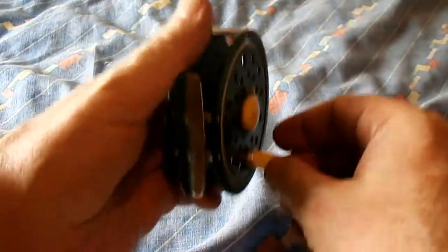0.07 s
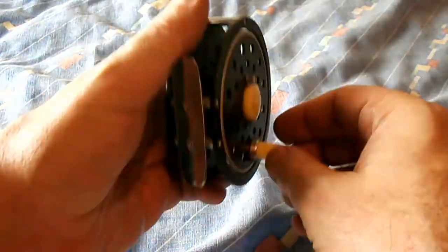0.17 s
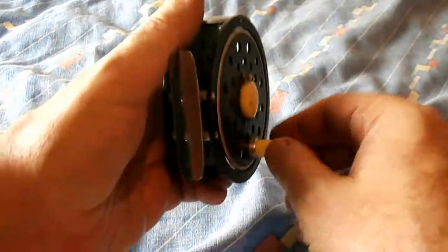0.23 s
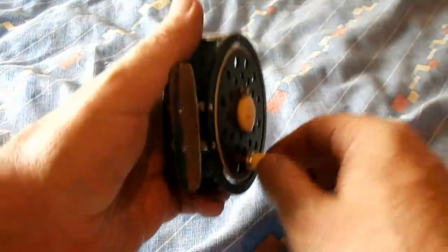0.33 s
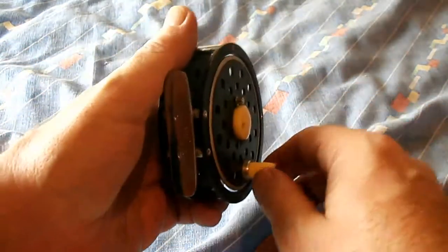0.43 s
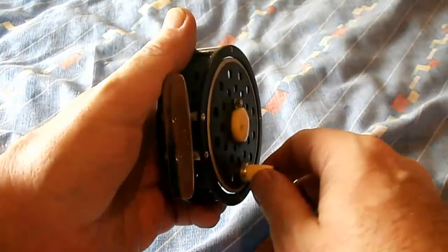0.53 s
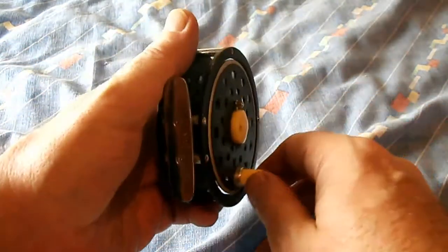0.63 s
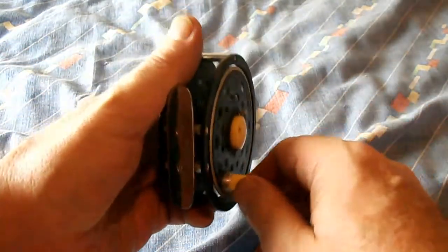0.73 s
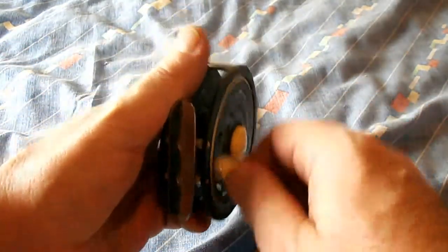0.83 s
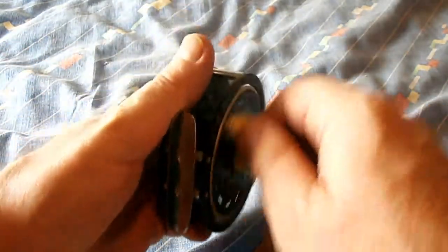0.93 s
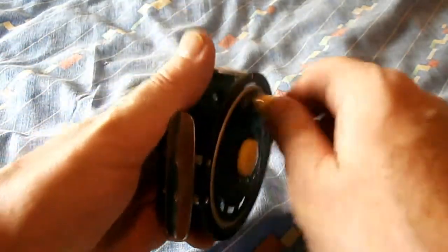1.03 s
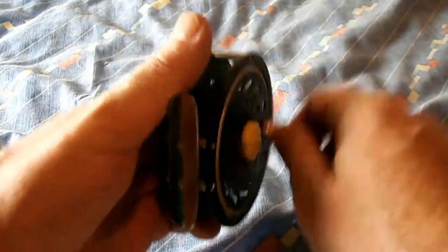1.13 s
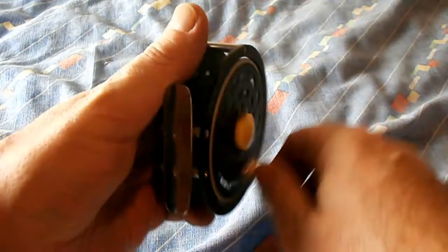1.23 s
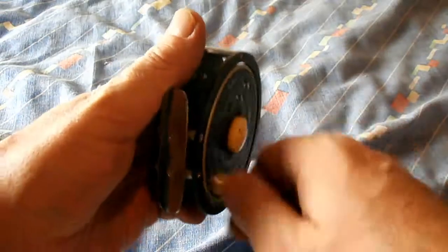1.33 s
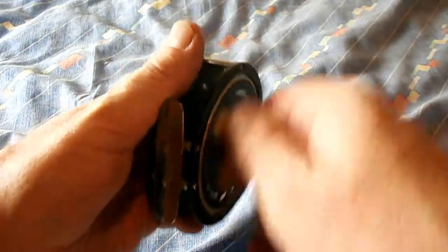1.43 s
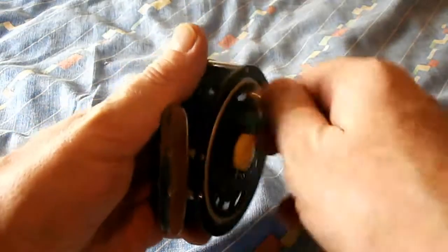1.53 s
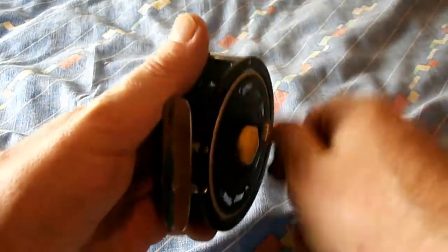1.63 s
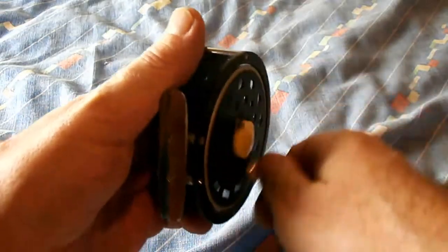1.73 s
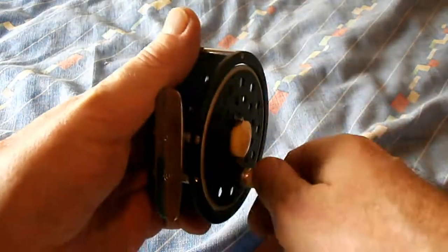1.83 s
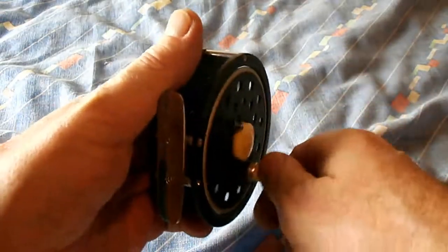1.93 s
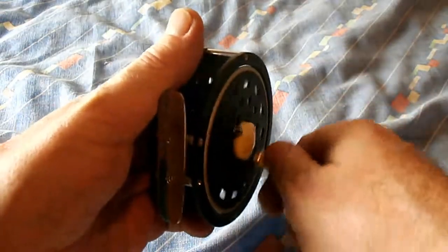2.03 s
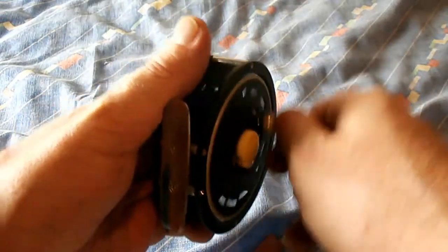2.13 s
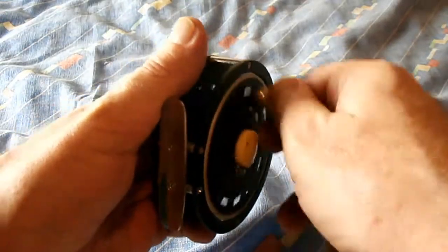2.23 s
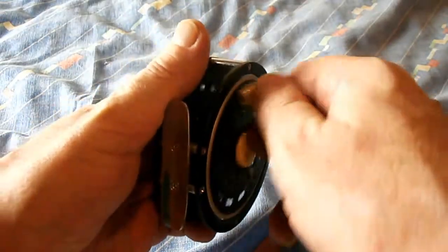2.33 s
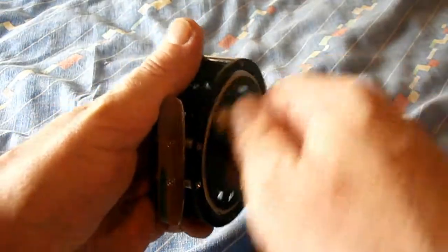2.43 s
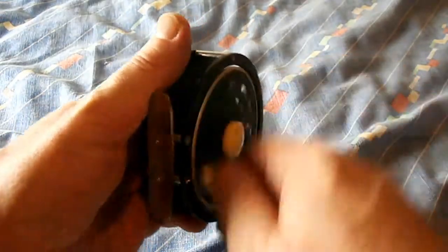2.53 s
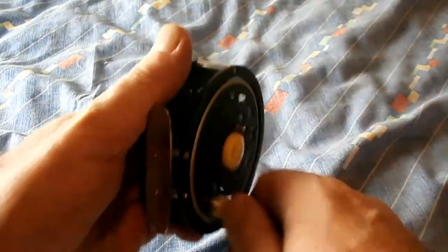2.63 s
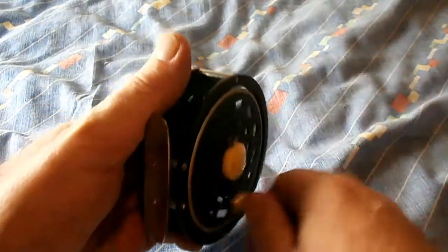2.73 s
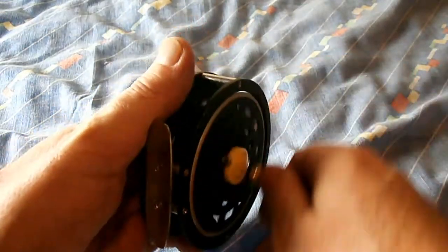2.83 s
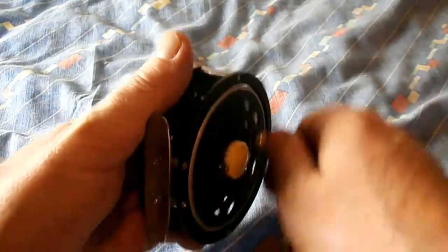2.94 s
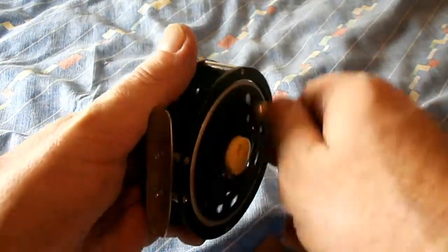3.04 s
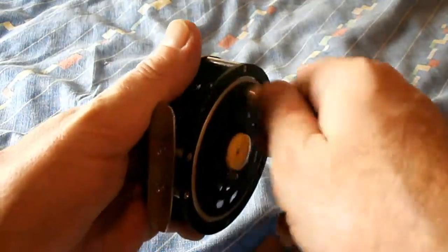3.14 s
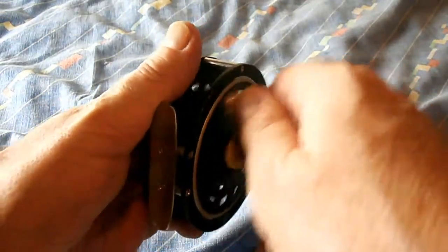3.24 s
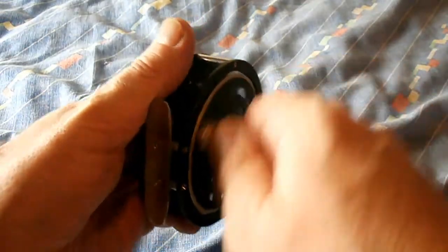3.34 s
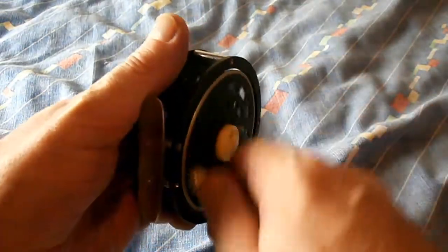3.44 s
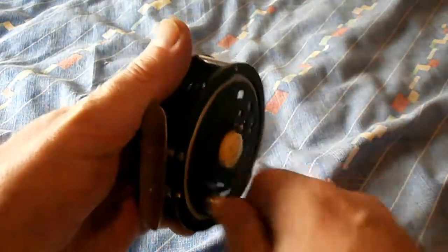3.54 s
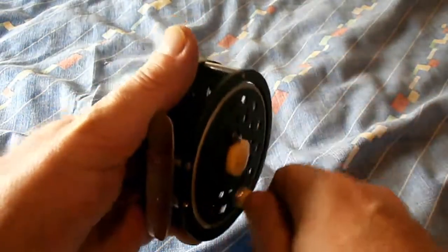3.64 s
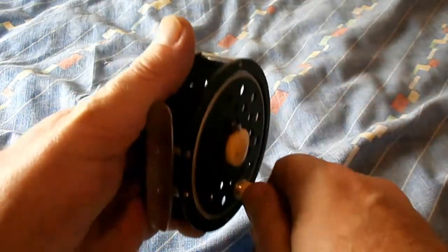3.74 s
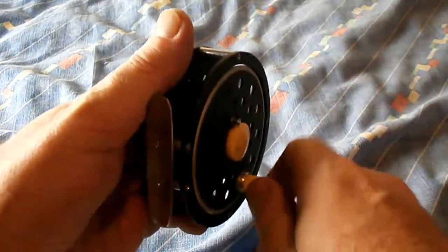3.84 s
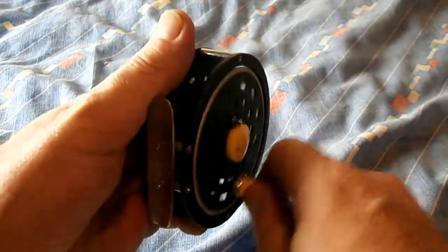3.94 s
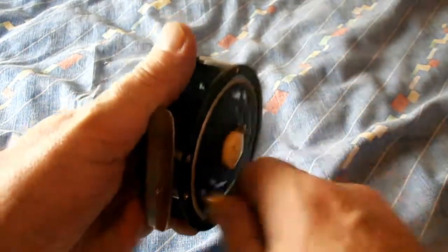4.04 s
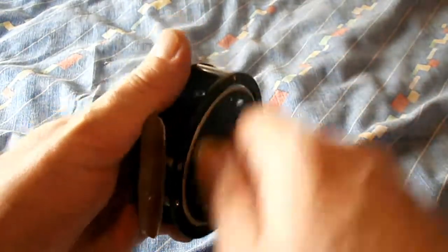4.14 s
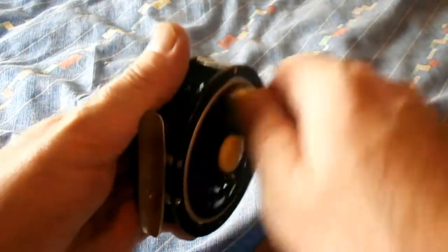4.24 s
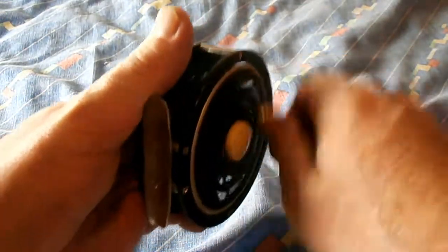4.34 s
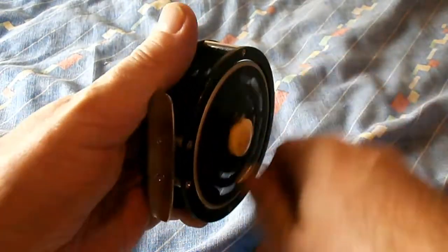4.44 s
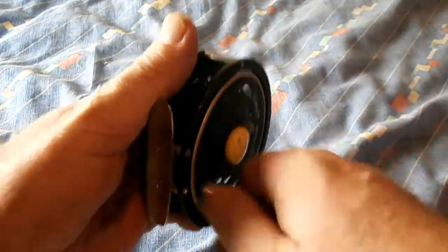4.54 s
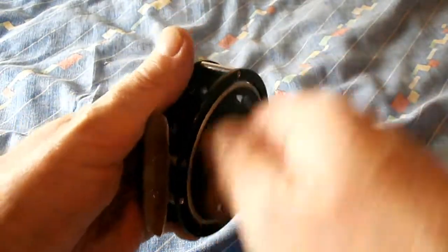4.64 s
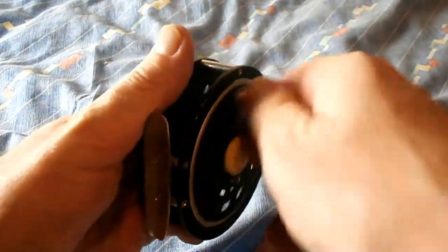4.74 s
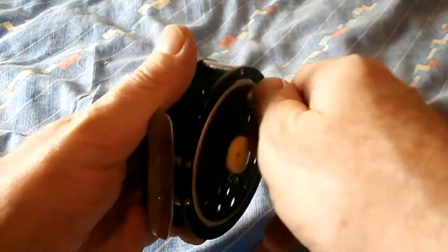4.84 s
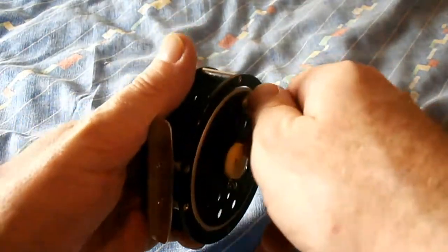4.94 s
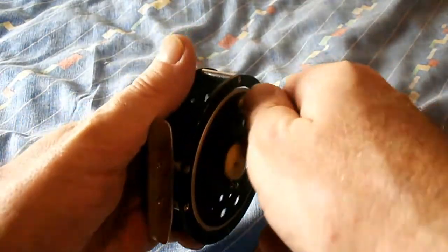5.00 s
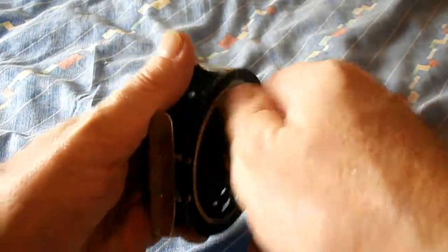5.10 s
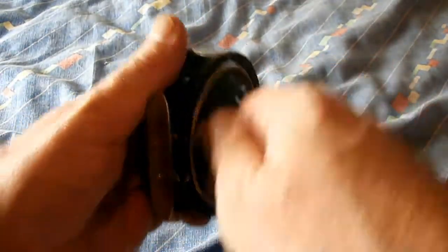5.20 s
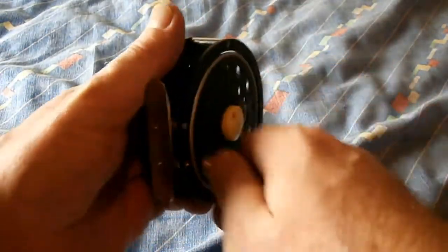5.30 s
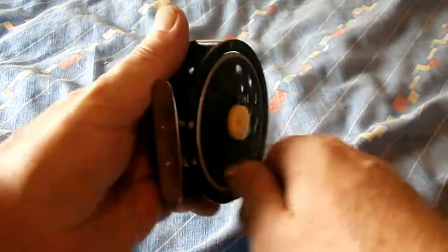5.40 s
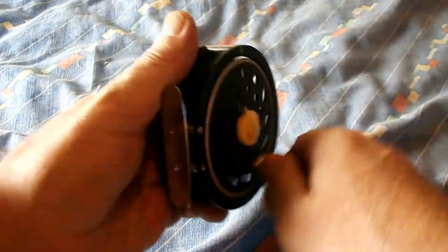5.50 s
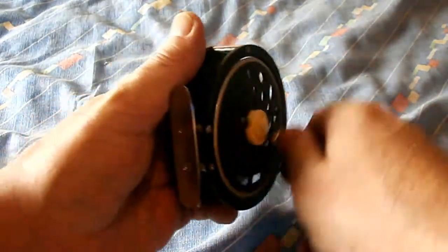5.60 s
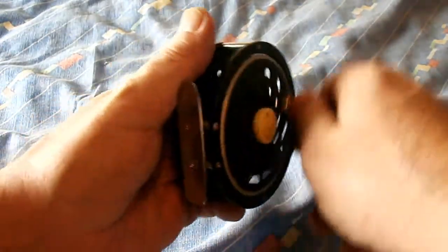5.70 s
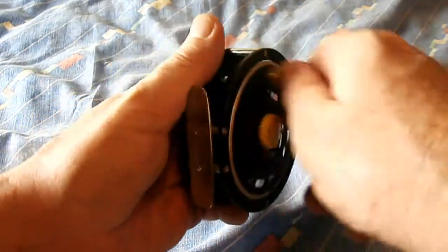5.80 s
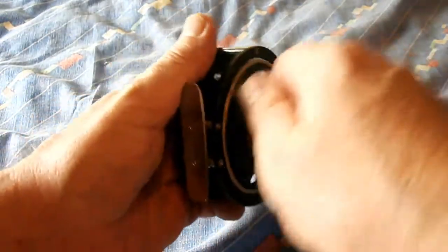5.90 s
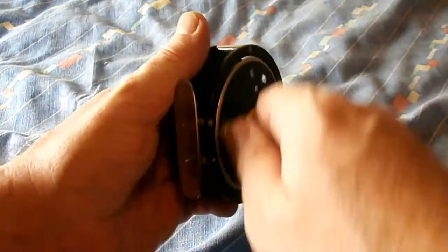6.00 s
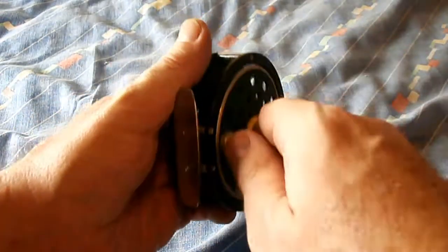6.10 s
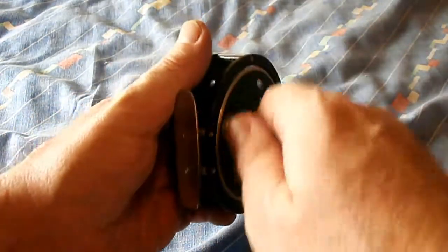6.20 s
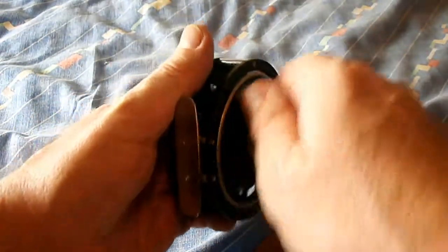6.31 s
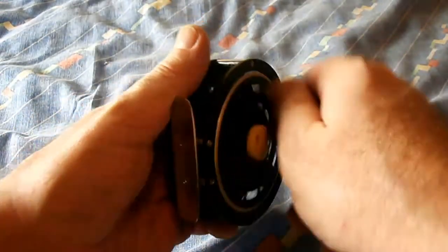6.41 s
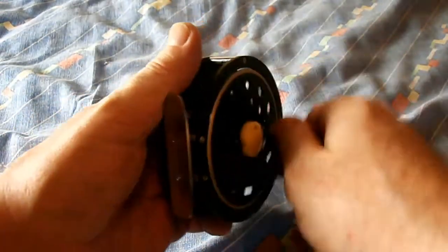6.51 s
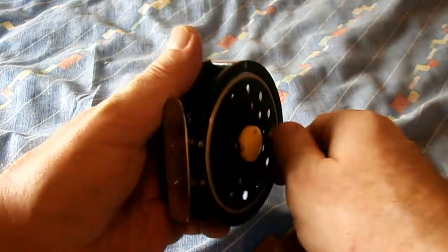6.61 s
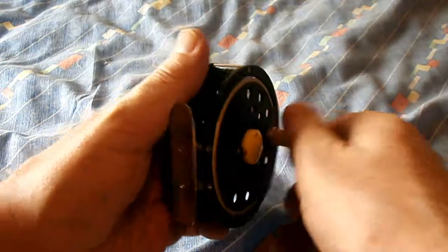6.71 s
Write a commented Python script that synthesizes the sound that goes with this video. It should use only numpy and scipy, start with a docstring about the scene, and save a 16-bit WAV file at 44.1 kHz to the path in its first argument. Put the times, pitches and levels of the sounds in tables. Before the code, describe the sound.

A fishing reel is cranked by hand, its ratchet snapping in four short runs of sharp metallic clicks over faint room hiss.

```python
"""A soft bedroom rumble, hiss and a thin electronic whine run from start to end. Loose parts tick first.
Then a hand cranks a fly reel: its pawl, a springy catch, snaps over the ratchet teeth. Each snap
overloads the small microphone close by and leaves a short echo. After 2 s the reel turns the other way,
and at 3.7 s a hand bumps the frame. The reel goes forward again, backward from 5 s, then forward for
two last snaps, and two light ticks end the scene."""
import sys
import numpy as np
from scipy import signal
from scipy.fft import rfft, irfft, next_fast_len
from scipy.io import wavfile

SR = 44100
rng = np.random.default_rng(int(sys.argv[2]) if len(sys.argv) > 2 else 0)


def unload_audio(sound):
    """Save the sound as a 16-bit wav file, at the path given as the first command line argument."""
    columns = np.transpose(np.atleast_2d(sound))
    # keep every value between -1 and 1, then stretch to whole-number steps
    steps = np.round(np.clip(columns, -1, 1) * 32767)
    wavfile.write(sys.argv[1], SR, steps.astype(np.int16))


N = 298116
TIME = np.arange(N) / SR
AGE = np.arange(int(.3 * SR)) / SR  # seconds since a short sound began


def undb(db):
    """Turn decibels into a number to multiply by."""
    return 10 ** (np.asarray(db) / 20)


def unit(x):
    """Scale a sound to an average (rms) level of 1."""
    return x / np.sqrt(np.mean(x ** 2))


def add(track, s, sound):
    """Mix a sound into the track, starting at s seconds."""
    start = int(s * SR)
    track[start:start + len(sound)] += sound[:len(track) - start]


def colour(x, points):
    """Turn lows and highs up or down along a curve of (pitch_hz, gain_db) points."""
    hz, db = np.transpose(points)
    size = 2 * next_fast_len(len(x) // 2 + 1)
    bins = np.maximum(np.fft.rfftfreq(size, 1 / SR), 1)
    gain = undb(np.interp(np.log(bins), np.log(hz), db))
    # these steps keep the filter from ringing before a sound starts
    cepstrum = irfft(np.log(gain))[:size // 2]
    cepstrum[1:] *= 2
    return irfft(rfft(x, size) * np.exp(rfft(cepstrum, size)))[:len(x)]


def band_noise(hz, q):
    """Noise around one pitch; a higher q makes the band narrower."""
    b, a = signal.iirpeak(hz, q, SR)
    noise = rng.standard_normal(len(AGE))
    return unit(signal.lfilter(b, a, signal.lfilter(b, a, noise)))


def whine(hz, db, wander_hz, turns_per_s=12):
    """A thin electronic tone whose pitch wanders a little at random."""
    turns = rng.standard_normal(int(turns_per_s * N / SR) + 2)
    pitch_hz = hz + wander_hz * np.interp(TIME * turns_per_s, np.arange(len(turns)), turns)
    return np.sqrt(2) * undb(db) * np.sin(2 * np.pi * np.cumsum(pitch_hz) / SR)


def background():
    """The room rumbles, the microphone hisses and the electronics whine."""
    # shape of the rumble and hiss: pitch_hz, gain_db
    noise_shape = [(25, -2), (60, 4), (130, 8.5), (280, 5), (600, -2.5), (1500, -13.5), (3500, -15.5),
                   (5500, -18.5), (8000, -15.5), (9900, -10), (11800, -18.5), (14200, -18), (15000, -16),
                   (15700, -60)]
    # whines of steady loudness: pitch_hz, level_db, wander_hz
    steady_whines = [(3262, -84, 2), (14947, -62, 1), (15004, -77, 3), (14889, -78, 3), (15176, -81, 15)]
    # one more whine swells and fades: time_s, level_db
    swell = [(0.1, -77.5), (0.6, -76.5), (1.98, -71), (3.92, -81), (5.01, -74.5), (6.26, -69), (6.71, -82)]
    out = undb(-58) * unit(colour(rng.standard_normal(N), noise_shape))
    for hz, db, wander_hz in steady_whines:
        out += whine(hz, db, wander_hz)
    swell_db = np.interp(TIME, *np.transpose(swell))
    return out + whine(3398.5, swell_db, wander_hz=2)


def room_echo(x, fade_s=0.2, build_s=0.031, early_db=-6, grain=0.5):
    """Wall echoes build up and die in the bedding; the reel sways, so each sound gets a new pattern."""
    echoes = rng.standard_normal(len(AGE)) * np.exp(grain * rng.standard_normal(len(AGE)))
    build_up = undb(early_db * np.exp(-(AGE / build_s) ** 2))
    tail = echoes * build_up * np.exp(-np.log(1000) * AGE / fade_s)
    # the small reel sends few low notes into the room: pitch_hz, gain_db
    shape = [(1000, -18.5), (2200, -8.5), (3000, -9), (4050, -3.5), (5200, -3), (7000, -5.5),
             (14000, -8.5)]
    tail = colour(tail / np.sqrt(np.sum(tail ** 2)), shape)
    return undb(-6) * signal.fftconvolve(x, tail)[:len(x)]


def ring(notes):
    """A struck part rings with notes that drop 60 dB in fade_s; each blow lands a little differently."""
    out = 0
    for hz, db, fade_s in notes:
        scatter_db, detune, phase = rng.standard_normal(3) * [1.5, .005, np.pi]
        wave = np.sin(2 * np.pi * hz * (1 + detune) * AGE + phase)
        out = out + undb(db + scatter_db) * wave * np.exp(-np.log(1000) * AGE / fade_s)
    return out


def handling(tick_s=0.0027):
    """The loose handle ticks against the spool; the soft hand gives the frame only a dull bump."""
    # light ticks: start_s, level_db, pitch_hz, spool_ring_db
    ticks = [(0.2258, -55.5, 3360, -16), (0.289, -47, 3170, -27), (0.9957, -47, 7850, -40),
             (1.505, -46, 8700, -41), (2.176, -50.5, 3500, -20), (3.679, -52, 2900, -25),
             (3.9365, -50, 2840, -30), (6.3455, -47, 7740, -34), (6.6893, -51, 2860, -26),
             (6.7413, -53.5, 2350, -2)]
    # notes of the free spool: pitch_hz, level_db, fade_s
    spool_notes = [(2283, 0, .25), (5292, -8, .25), (7747, -7, .25), (10750, -14, .15)]
    # hand bumps: start_s, level_db, pitch_hz, decay_s
    bumps = [(3.738, -48, 527, 0.022), (3.750, -50.5, 840, 0.035)]
    out = np.zeros(N)
    for start_s, db, hz, ring_db in ticks:
        click = band_noise(hz, q=1.6) * np.exp(-AGE / tick_s)
        tick = undb(db) * (click + undb(ring_db) * ring(spool_notes))
        add(out, start_s, tick + room_echo(tick))
    for start_s, db, hz, decay_s in bumps:
        add(out, start_s, undb(db) * band_noise(hz, q=1.7) * np.exp(-AGE / decay_s))
    return out


def crack(shape, decay_s=0.0014):
    """Steel hits a tooth: a very short, dry burst of noise."""
    return undb(-4) * unit(colour(rng.standard_normal(len(AGE)), shape)) * np.exp(-AGE / decay_s)


def pawl(thud_hz=320, thud_s=0.0003, fizz_s=0.0005, bounce_s=0.003):
    """The springy pawl cracks onto each tooth, rings the reel and bounces once."""
    # one snap per tooth: start_s, strength_db
    snaps = [(0.8847, -6.5), (1.0393, -0.9), (1.1693, -0.5), (1.3075, -4), (1.431, -7.5), (1.5398, -0.5),
             (1.669, -1.7), (2.2152, -4), (2.3224, -4), (2.4299, -3), (2.5213, -2.5), (2.589, -2.5),
             (2.7064, -3.5), (2.8035, -8.5), (2.9183, -2), (3.0514, -3.5), (3.1928, -3), (3.2996, -0.5),
             (3.4016, -3.1), (3.4977, -3.5), (3.5933, -4), (4.126, -8), (4.2504, -1), (4.37, -4),
             (4.4865, -4.9), (4.6115, -6.5), (4.7382, -2.5), (5.169, -2.5), (5.2568, -3), (5.3417, -2.5),
             (5.4583, -4), (5.5543, -2.7), (5.6893, -3), (5.7825, -1.8), (5.8514, -6), (5.9305, -5.5),
             (6.0196, -3), (6.395, -2.4), (6.5424, -1)]
    # when the handle turns backward: start_s, end_s
    backward_spans = [(2.0, 3.8), (5.0, 6.2)]
    # shape of the crack of steel: pitch_hz, gain_db
    crack_shape = [(1500, -39), (2800, -23), (4000, -14), (5100, -22.5), (5700, -15.5), (6250, -2.5),
                   (7250, 2), (7800, -3.5), (8900, -4.5), (9900, -10), (11000, -9), (13300, -13),
                   (15500, -15)]
    # notes of the struck reel: pitch_hz, forward_db, backward_db, fade_s
    reel_notes = [(1824, -25.5, -42, 0.037), (2002, -25, -37.5, 0.019), (2302, -30, -38.5, 0.043),
                  (2930, -15.5, -28.5, 0.02), (3824, -41, -23, 0.017), (4226, -30.5, -39, 0.1),
                  (4480, -43, -45, 0.009), (6020, -15, -18, 0.011), (6560, -8, -12, 0.01),
                  (6760, -5, -3, 0.01), (7316, -2.5, -3.5, 0.01), (8210, -28, -4.5, 0.0064),
                  (8832, -4, -6, 0.015)]
    # the bounce is too light to shake the side plate, so it sounds thinner: pitch_hz, gain_db
    bounce_shape = [(4500, -8.5), (6000, 0)]
    # going backward, the pawl hits the other side of the teeth and sounds fuller; harder snaps mainly
    # add ring at 6-8 kHz: pitch_hz, forward_db, backward_db, growth (dB per dB of strength)
    contact = [(3000, -4, 4, -0.12), (3520, -4.5, 4, 0.28), (4600, -6, 3.5, 0), (5950, 0, -2, 0.87),
               (7800, 0.5, 1.5, 1), (9100, -3, 1, .5), (10600, -6, -1.33, 0.17)]
    out = np.zeros(N)
    blow = colour(signal.unit_impulse(len(AGE)), crack_shape)  # the crack as sent into the room
    blow = undb(9) * blow / np.sqrt(np.sum(blow ** 2))
    # a short low thud from the overloaded microphone on each snap
    thud = np.cos(2 * np.pi * thud_hz * AGE) * np.exp(-AGE / thud_s)
    for start_s, strength_db in snaps:
        backward = any(start < start_s < end for start, end in backward_spans)
        notes = [(hz, back_db if backward else forward_db, fade_s)
                 for hz, forward_db, back_db, fade_s in reel_notes]
        ringing = undb(-13) * ring(notes)
        strike, bounce = crack(crack_shape), crack(crack_shape)
        # a very short, very high fizz as the snap overloads the microphone
        fizz = undb(-9) * band_noise(hz=14900, q=4.5) * np.exp(-AGE / fizz_s)
        direct = strike + ringing + fizz
        add(direct, bounce_s * rng.uniform(.88, 1.12), undb(-9) * colour(bounce, bounce_shape))
        snap_shape = [(hz, (back_db if backward else forward_db) + growth * strength_db)
                      for hz, forward_db, back_db, growth in contact]
        thud_db = strength_db + (-15.5 if backward else -24) + 2.5 * rng.standard_normal()
        snap = colour(direct + room_echo(blow + ringing), snap_shape)
        add(out, start_s, snap + undb(thud_db) * thud)
    return out


def scene():
    """The reel, the hands and the background, mixed into one channel."""
    return (pawl() + handling() + background())[None]


def record(dry, ceiling=.15, smooth_s=.006, top_hz=15680):
    """The overloaded input flattens each snap, the volume control dips briefly, and the top is cut."""
    # tone of the recorder: pitch_hz, gain_db
    recorder_shape = [(30, -7.5), (110, -7), (700, -2), (2000, 0.5), (9000, -0.5), (13000, -3.5),
                      (15000, 1)]
    fine = signal.resample_poly(dry[0], 4, 1)  # finer steps keep the flattening from adding stray tones
    flattened = fine / (1 + (fine / ceiling) ** 8) ** (1 / 8)
    clipped = signal.resample_poly(flattened, 1, 4)
    carry_over = np.exp(-1 / (smooth_s * SR))
    loudness = np.abs(clipped)
    for _ in range(2):  # smooth the loudness twice
        loudness = signal.lfilter([1 - carry_over], [1, -carry_over], loudness)
    out = colour(clipped / (1 + 7 * loudness), recorder_shape)
    top_cut = signal.ellip(8, .2, 70, top_hz, fs=SR, output="sos")
    return signal.sosfilt(top_cut, out)[None]


dry = scene()
out = record(dry)
unload_audio(out)
```